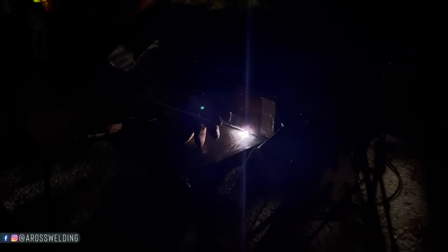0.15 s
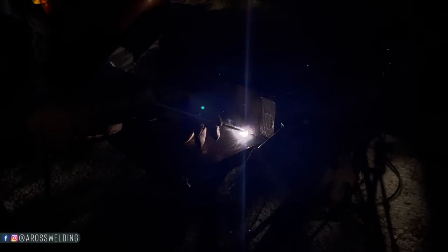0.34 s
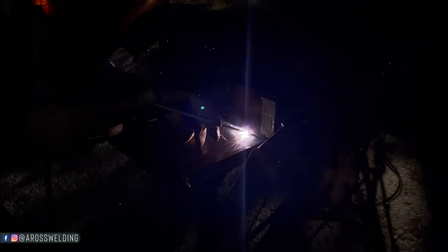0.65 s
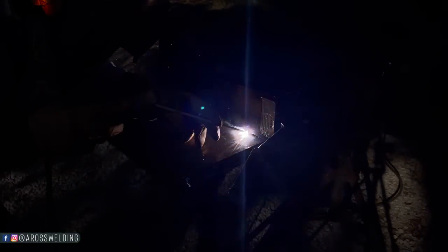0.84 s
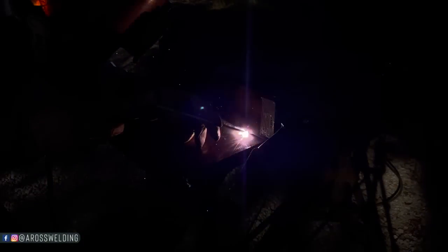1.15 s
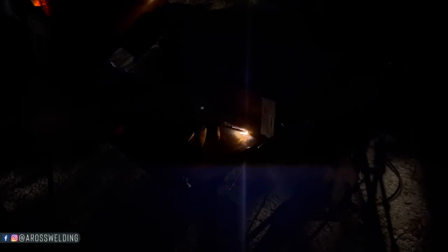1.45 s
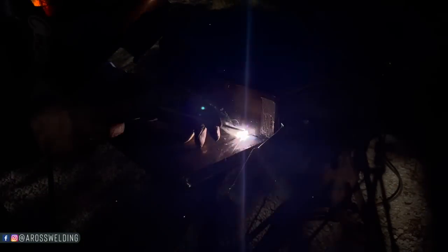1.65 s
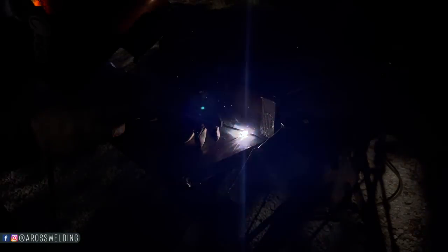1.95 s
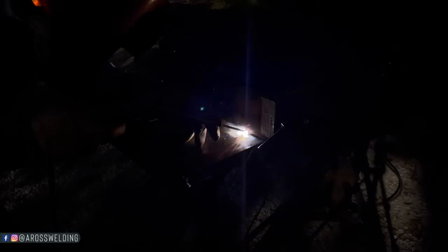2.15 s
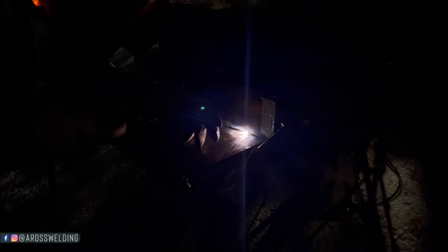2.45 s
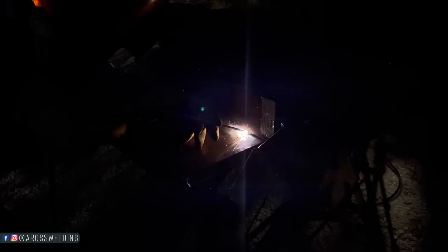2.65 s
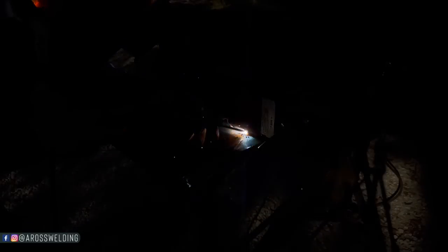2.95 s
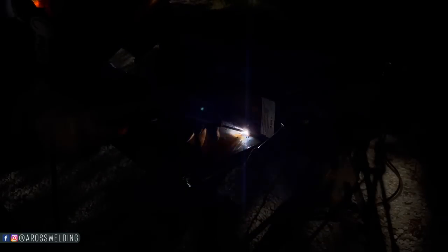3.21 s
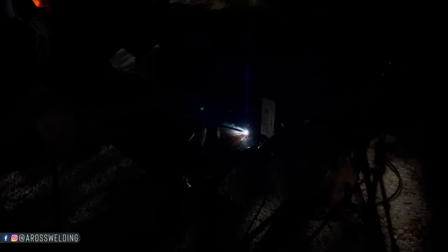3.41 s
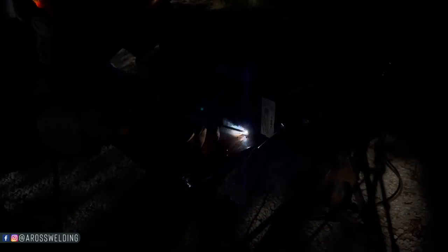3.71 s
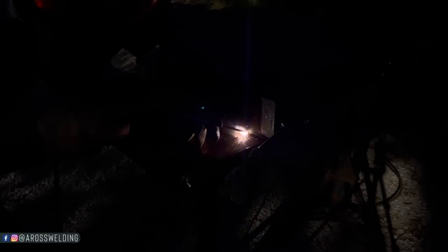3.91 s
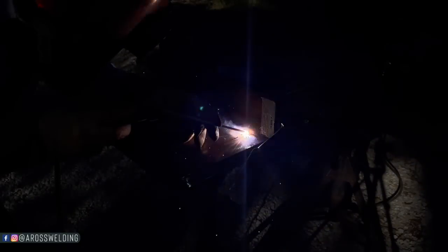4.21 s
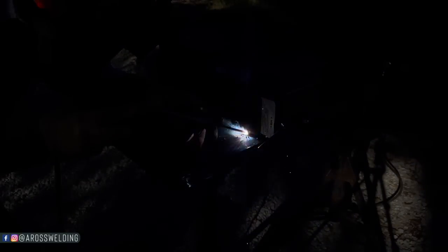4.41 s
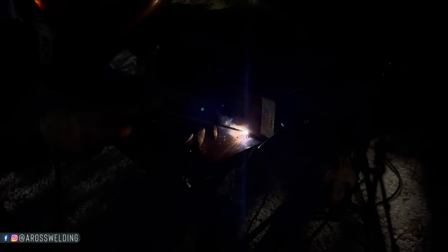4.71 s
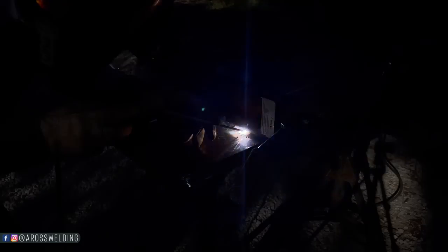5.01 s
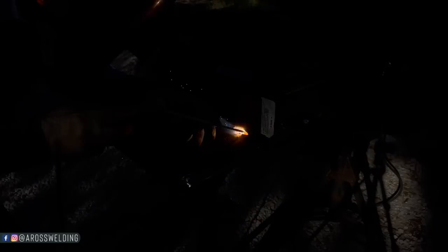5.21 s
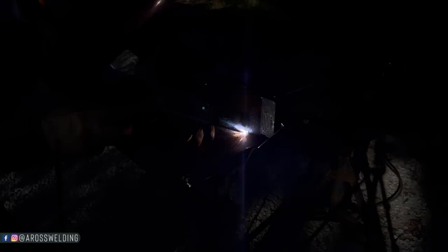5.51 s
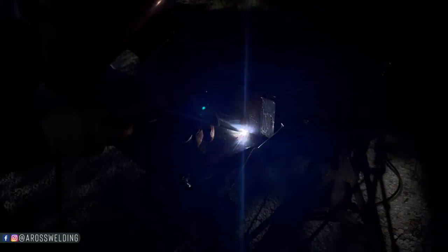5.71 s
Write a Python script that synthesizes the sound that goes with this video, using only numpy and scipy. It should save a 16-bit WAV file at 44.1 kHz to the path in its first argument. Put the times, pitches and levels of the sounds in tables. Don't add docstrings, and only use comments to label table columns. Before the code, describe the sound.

Outdoors, an engine-driven welder drones steadily while a close welding arc hisses, spits and snaps, with low wind thumps hitting the microphone.

```python
import sys
import numpy as np
from scipy import signal
from scipy.fft import rfft, irfft, next_fast_len
from scipy.io import wavfile
from scipy.ndimage import uniform_filter1d, map_coordinates

SR = 44100
rng = np.random.default_rng(int(sys.argv[2]) if len(sys.argv) > 2 else 0)


def unload_audio(sound):
    columns = np.transpose(np.atleast_2d(sound))
    steps = np.round(np.clip(columns, -1, 1) * 32767)
    wavfile.write(sys.argv[1], SR, steps.astype(np.int16))


def convert_level_to_amplitude(level_db):
    exponent = np.asarray(level_db, float) / 20
    return 10 ** exponent


N = 258426
TIME = np.arange(N) / SR
FIRING_HZ = 58.728

# (multiple of the firing rate, level [dB])
EXHAUST_HARMONICS = [(1, -0.5), (2, -16), (3, -11), (4, -24), (5, -40.5), (6, -24), (7, -23.5), (8, -34),
                     (9, -49), (10, -25), (11, -36), (12, -37.5)]
# (frequency [Hz], density [dB per Hz])
CASING_ROAR = [(25, -13), (60, -8.5), (110, -6), (200, -4), (300, -8.5), (450, -10), (700, -12.5),
               (1000, -15.5), (1500, -17.5), (2600, -21.5), (4000, -27), (8000, -44)]
# (frequency [Hz], likeness [0-1], left over right [dB], extra right lead [rad])
ENGINE_PORTS = [(60, 0.76, 1, 0), (129, 1, -10, 0.0012), (175, 0.72, 2, 0.38), (221, 0.75, 0, 0.65),
                (500, 0.9, -3, 1), (1180, 0.8, -0.5, 0.37), (2530, 0.93, -2.5, 0.32), (4970, 0.076, 6, 1)]
# (time [s], level [dB])
ARC_HISS = [(0, -28), (.4, -31.5), (.75, -31.5), (1.1, -32.5), (1.4, -30), (1.7, -30.5), (2.1, -29.5),
            (2.6, -30), (2.85, -30.5), (3.1, -31.5), (3.7, -31.5), (4.0, -33), (4.35, -32.5), (4.55, -35.5),
            (4.95, -32), (5.5, -33.5), (5.86, -31)]
# (time [s], length [s], peak level [dB], spacing [s])
SHORT_RUNS = [(0.049, 0.03, -14, .009), (0.345, 0.022, -6.5, .012), (0.512, 0.026, -8.5, .008),
              (0.592, 0.019, -4.5, .009), (.7137, 0.026, -11.5, .014), (0.853, .029, -9, .006),
              (.9488, .0097, -4, .01), (1.0304, .0234, -5, .011), (1.136, .0195, -7, .007),
              (1.4264, .0355, -10.5, .009), (1.7053, .011, -5.5, .0055), (1.781, .0356, -1.5, .012),
              (2.107, .0314, -14, .011), (2.168, 0.01, -5.5, .006), (2.356, .0274, -10, .007),
              (2.4768, 0.016, -4.5, .006), (2.624, 0.023, -7, .02), (2.823, .034, -6, .009),
              (2.8633, .0367, -0.5, .006), (3.032, .0064, -5.5, .006), (3.135, .0289, -4.5, .006),
              (3.247, .0289, -6.5, .006), (3.585, 0.0088, -6.5, .01), (4.012, .0159, -10.5, .008),
              (4.178, .0201, -6, .005), (5.099, .05, -10.5, .01), (5.1906, .0117, -5, .012),
              (5.357, 0.0064, -7.5, .006), (5.418, .0264, -8, .009), (5.547, 0.0082, -7, .011)]
# (time [s], peak level [dB])
LONE_SNAPS = [(.118, -6.5), (0.3564, -2), (0.7, -14), (0.8244, -9), (1.2596, -4), (1.557, 0.5), (1.764, -7),
              (1.8945, 1.5), (2.374, -0.5), (2.5199, 1.5), (2.5484, -5), (2.639, 2.5), (2.9173, -7),
              (4.0456, -3.5), (3.064, 2), (3.193, -4), (3.456, -4), (3.5482, -5.5), (3.6657, -6.5),
              (3.7427, -7), (3.7732, -9), (3.8526, -10), (4.3774, -6), (4.4436, -8), (4.5574, -5.5),
              (4.758, -7), (4.8053, -0.5), (4.858, -10), (4.993, -1), (5.798, -2.5)]
# (delay [s], level [dB])
PLATE_ECHOES = [(.0004, -9), (.00115, -11), (.0022, -18)]
# (frequency [Hz], density [dB per Hz])
ARC_LEFT = [(1000, -10), (1700, -6.5), (2600, 3), (3500, 0), (4400, -3), (5600, 1), (6900, 3), (8000, 4),
            (9200, 2), (10500, -2), (12000, -6.5), (13600, -12), (14600, -3.5), (15600, -3.5)]
ARC_RIGHT = [(1000, -0.5), (1700, -5.5), (2600, 0), (3500, -6.5), (4400, -4.5), (5600, 0.5), (6900, 8),
             (8000, 4.5), (9200, 4.5), (10500, -3), (12000, -7), (13600, -6.5), (14600, -6), (15600, -5)]
# (frequency [Hz], extra right lead [rad])
HOUSING_BEND = [(1000, -5.5), (2000, -4.8), (2600, -3.3), (3200, -2.7), (3800, -1.2), (4300, -.6),
                (5000, -1), (5700, 0), (6500, 2.4), (7000, 2.7), (9000, 2.75)]
# (time [s], buffet level [dB], port difference [dB])
GUSTS = [(1.7, -37.5, -8), (2.61, -32, -17), (2.72, -25, -15), (3.32, -33, -8), (3.41, -29.5, -9),
         (3.85, -33, 0), (4.37, -30, -11), (4.57, -29, -8), (4.71, -32, -10), (4.91, -37, -10),
         (5.07, -35, -15), (5.23, -38, -10), (5.4, -35, -12)]
# (frequency [Hz], density [dB per Hz])
BUFFET_COLOUR = [(20, -22), (38, -1), (55, 7), (70, 4), (90, -3), (150, -10), (230, -18), (400, -40)]
# (time [s], peak level [dB], frequency [Hz], push or pull [signed factor])
PUFFS = [
    (2.139, -12, 73, -0.99),
    (2.53, -29, 70, -0.18),
    (3.31, -22, 110, 0.73),
    (3.488, -15.5, 85, -1.33),
    (3.748, -5.5, 105, 0.75),
    (4.198, -12.5, 500, -0.79),
    (4.2, -14, 110, -1.13),
    (4.703, -16, 101, 1),
    (5.151, -9.5, 118, -1.35),
]
# (time [s], gain change [dB], recovery [s])
GAIN_DUCKS = [
    (.37, 1, 0.93),
    (1.82, -2.5, 0.5),
    (2.645, -8.5, 0.23),
    (2.895, -1, 0.34),
    (3.27, -1, 1),
    (4.203, -7.5, 0.11),
]


def unit(x):
    return x / np.sqrt(np.mean(x ** 2) + 1e-20)


def along(points, hz, order=1):
    table = np.transpose(points)
    return np.interp(np.log(hz + 1), np.log(table[0] + 1), table[order])


def curves(rows):
    s, *columns = np.transpose(rows)
    return [np.interp(TIME, s, column) for column in columns]


def wobble(rate):
    knots = rng.standard_normal(int(N * rate / SR) + 4)
    return map_coordinates(knots, [TIME * rate])


def filtered(x, response):
    m = next_fast_len(N + 8192)
    return irfft(rfft(x, m) * response(np.fft.rfftfreq(m, 1 / SR)), m)[..., :N]


def causal(gain):
    cepstrum = irfft(np.log(gain + 1e-6))
    half = len(cepstrum) // 2
    folded = np.r_[cepstrum[:1], 2 * cepstrum[1:half], np.zeros(len(cepstrum) - half)]
    return np.exp(rfft(folded))


def impulses(s, size):
    at = np.floor(s * SR).astype(int)[:, None] + np.arange(-8, 9)
    off = at - s[:, None] * SR
    shape = size[:, None] * np.sinc(off) * np.cos(np.pi * off / 18) ** 2
    return np.bincount(np.clip(at, 0, N).ravel(), shape.ravel(), N + 1)[:N]


def exhaust(turns):
    fire_s = np.interp(np.arange(np.ceil(turns[0]), turns[-1]), turns, TIME)
    chance = rng.standard_normal((len(fire_s), 2))
    alternate = (-1) ** np.arange(len(fire_s))
    size = 1 + .05 * chance[:, 0] + .03 * alternate
    harmonics = [(k * FIRING_HZ, db) for k, db in EXHAUST_HARMONICS]
    pipe = [(25, -46.0), (45, -13.0)] + harmonics + [(1500, -76.0)]
    pulses = impulses(fire_s + 0.00019 * chance[:, 1], size)
    return unit(filtered(pulses, lambda hz: causal(convert_level_to_amplitude(along(pipe, hz)))))


def casing_roar(turns):
    swell = 1 + 0.13 * np.cos(2 * np.pi * turns)
    swell = swell * convert_level_to_amplitude(0.96 * wobble(14) + 1.1 * wobble(2.38))
    roar = unit(filtered(swell * rng.standard_normal((2, N)), lambda hz: convert_level_to_amplitude(along(CASING_ROAR, hz))))

    def blend(hz):
        alike = np.clip(along(ENGINE_PORTS, hz), 0, 1)
        return np.array([alike, np.sqrt(1 - alike ** 2)])

    right = filtered(roar, blend).sum(axis=0)
    return np.array([roar[0], right])


def engine():
    turns = FIRING_HZ * TIME + .76
    both = convert_level_to_amplitude(-16.5) * exhaust(turns) + convert_level_to_amplitude(-27.5) * casing_roar(turns)
    side = np.array([[1], [-1]]) / 2

    def ports(hz):
        lead = 2 * np.pi * hz * .00032 + along(ENGINE_PORTS, hz, order=3)
        return convert_level_to_amplitude(side * along(ENGINE_PORTS, hz, order=2)) * np.exp(-1j * side * lead)

    return filtered(both, ports)


def shorts():
    start, length, peak_db, spacing = np.transpose(SHORT_RUNS)[:, :, None]
    gaps = np.maximum(np.round(length / spacing), 1)
    k = np.arange(12)
    chance = rng.standard_normal((2, len(SHORT_RUNS), len(k)))
    inner = (k > 0) & (k < gaps)
    jitter = .25 * np.clip(chance[0], -2, 2)
    run_s = start + length / gaps * (k + inner * jitter)
    run_db = peak_db + 2.5 * np.clip(chance[1], -2, .5) * (k > 0)
    patter_s = rng.random(180) * N / SR
    patter_db = -18 + 3.5 * np.clip(rng.standard_normal(len(patter_s)), -2, 1)
    snap_s, snap_db = np.transpose(LONE_SNAPS)
    return np.r_[run_s[k <= gaps], snap_s, patter_s], np.r_[run_db[k <= gaps], snap_db, patter_db]


def spatter_ticks():
    draws = rng.random((2600, 3))
    sign = np.sign(draws[:, 1] - .5)
    return unit(impulses(draws[:, 0] * N / SR, sign * convert_level_to_amplitude(12 * draws[:, 2] ** 2)))


def droplet_snaps(s, db):
    thud_db = 0.5 * db - 0.5 - 0.75 * s + 1.17 * rng.standard_normal(len(s))
    t = np.arange(130) / SR - .0003
    fade_db = -60 * np.where(t < 0, -t / .0012, t / .0014)
    crack = .24 * rng.standard_normal((len(s), len(t))) * convert_level_to_amplitude(fade_db)
    crack[:, np.argmin(np.abs(t))] = -1
    crack /= np.linalg.norm(crack, axis=1, keepdims=True)
    at = np.clip(np.round((s[:, None] + t) * SR).astype(int), 0, N).ravel()

    def lay(level_db):
        return np.bincount(at, (convert_level_to_amplitude(level_db)[:, None] * crack).ravel(), N + 1)[:N]

    def bright(hz):
        return 1 / (1 + (4200 / (hz + 1)) ** 2)

    return filtered(lay(db + 7.0), bright) + filtered(lay(thud_db), lambda hz: 1 - bright(hz))


def plate_echoes(hz):
    return 1 + sum(convert_level_to_amplitude(db) * np.exp(-2j * np.pi * hz * delay) for delay, db in PLATE_ECHOES)


def arc_ports(hz):
    left, right = [causal(convert_level_to_amplitude(along([(300, -41.5)] + p, hz))) for p in (ARC_LEFT, ARC_RIGHT)]
    lead = along(HOUSING_BEND, hz) - 2 * np.pi * hz * 0.0002293
    phase = np.angle(left) + [[-.5], [.5]] * lead
    return np.abs(np.array([left, right])) * np.exp(1j * phase)


def arc():
    s, db = shorts()
    unrest = uniform_filter1d(uniform_filter1d(impulses(s, convert_level_to_amplitude(db)), 500), 500) * 500
    steady = convert_level_to_amplitude(curves(ARC_HISS)[0] + 0.5 * wobble(7.2) + 0.97 * wobble(35) + 1.77 * wobble(120))
    flicker = steady * (.85 + .7 * np.abs(unrest))
    spray = convert_level_to_amplitude(-3.0) * flicker * rng.standard_normal(N) + convert_level_to_amplitude(-2) * steady * spatter_ticks()
    snaps = droplet_snaps(s, db)
    snap_level = np.sqrt(np.abs(uniform_filter1d(snaps ** 2, size=40)))
    splash = convert_level_to_amplitude(-5.5) * snap_level * rng.standard_normal((2, N))
    direct = spray + filtered(snaps, plate_echoes) + splash
    diffuse = [(4000, 0.5), (7000, -11), (9500, -9)]
    scatter = filtered(flicker * rng.standard_normal((2, N)), lambda hz: convert_level_to_amplitude(along(diffuse, hz)))
    return convert_level_to_amplitude(2.5) * filtered(direct + scatter, arc_ports)


def buffeting():
    level_db, apart_db = curves(GUSTS)
    blowing = (TIME > GUSTS[0][0]) & (TIME < GUSTS[-1][0])
    lumps = convert_level_to_amplitude(0.88 * np.array([wobble(21), wobble(16)]))
    noise = filtered(lumps * rng.standard_normal((2, N)), lambda hz: convert_level_to_amplitude(along(BUFFET_COLOUR, hz)))
    common, own = [unit(n) for n in noise]
    return blowing * convert_level_to_amplitude(level_db + 8) * (common + convert_level_to_amplitude(apart_db) * own * [[1], [-1]])


def puffs():
    out = np.zeros(N)
    for s, db, hz, push in PUFFS:
        u = (TIME - s) * hz
        out = out + push * convert_level_to_amplitude(db) * np.cos(2 * np.pi * u) * np.exp(-(u / 0.59) ** 2)
    return out


def scene():
    return engine() + arc() + buffeting() + puffs()


def band_limit(x):
    return signal.sosfilt(signal.butter(12, 16960, fs=SR, output="sos"), x)


def record(dry):
    gain_db = 0
    for s, db, recovery in GAIN_DUCKS:
        u = np.maximum(TIME - s, 0)
        gain_db = gain_db + db * (1 - np.exp(-u / 0.0038)) * np.exp(-u / recovery)
    x = dry * convert_level_to_amplitude(gain_db)
    x = x / (1 + np.abs(x / .95) ** 4) ** (1 / 4)
    x = filtered(x, lambda hz: np.where(hz < 15750, 1, convert_level_to_amplitude(-52)))
    return band_limit(x)


dry = scene()
out = record(dry)
unload_audio(out)
```